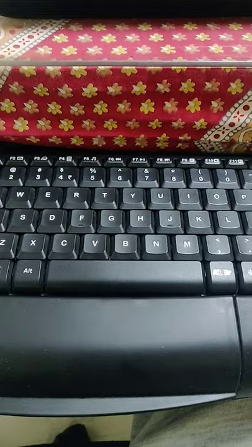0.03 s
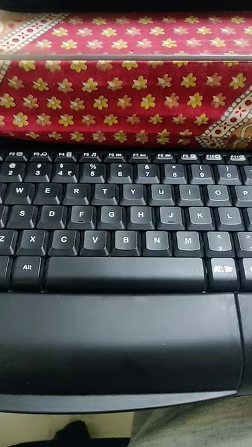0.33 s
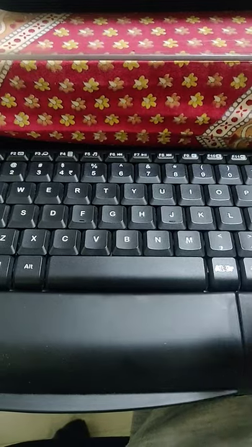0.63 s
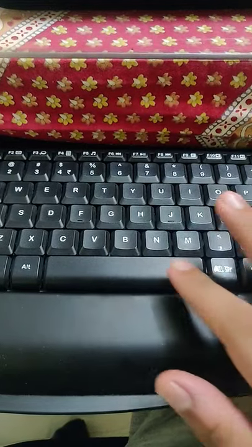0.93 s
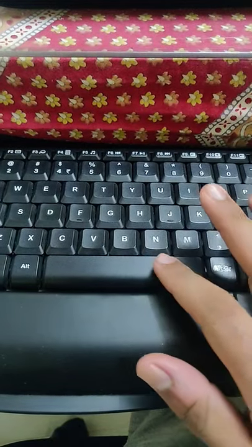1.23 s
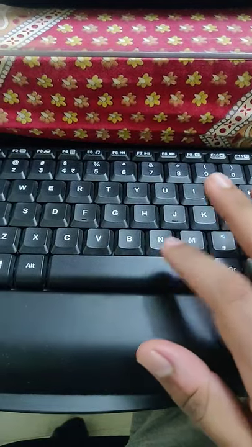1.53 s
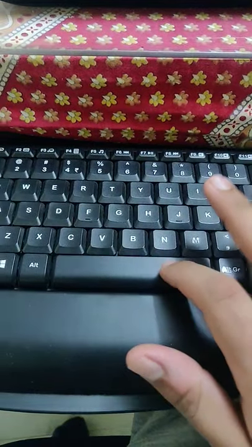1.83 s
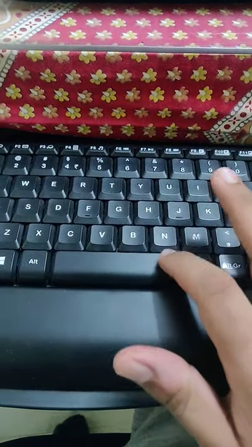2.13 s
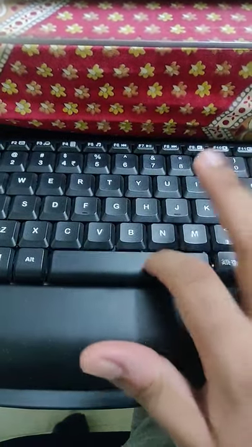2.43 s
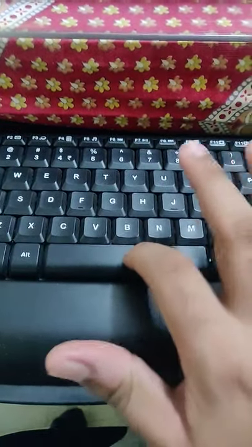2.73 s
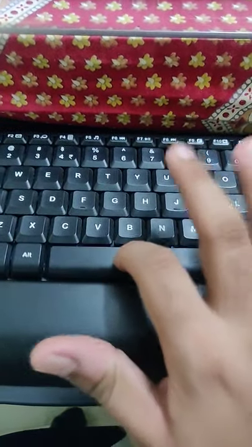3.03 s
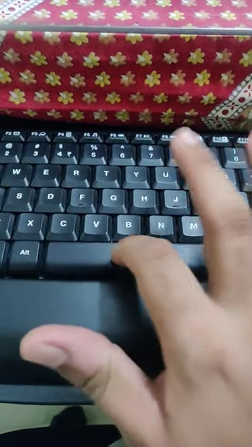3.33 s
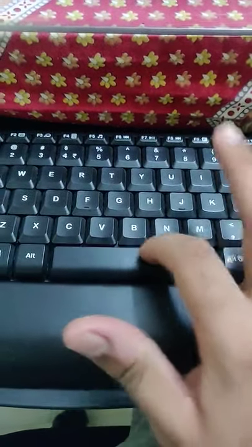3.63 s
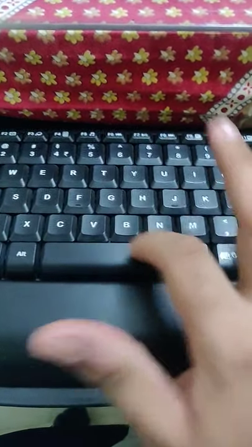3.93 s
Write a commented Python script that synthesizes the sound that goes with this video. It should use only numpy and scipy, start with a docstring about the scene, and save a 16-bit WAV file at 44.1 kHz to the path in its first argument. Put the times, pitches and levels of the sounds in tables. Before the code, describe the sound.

A finger taps a loose keyboard space bar, slowly at first, then in quick rattling clicks.

```python
"""A small quiet room: air noise, a low rumble and a wavering hum that soon recedes.
From 1.3 s a finger presses the space bar of a plastic keyboard a few times, close to the microphone.
Each contact is a short chatter of the loose bar and its wire, with a knock in the case.
From 2.6 s to the end the presses come in a rapid run: the rubber dome ticks, the bar rattles,
firm strokes thump the desk, the rumble is back up, and the room answers every stroke."""
import sys
import numpy as np
from scipy import signal
from scipy.fft import rfft, irfft
from scipy.io import wavfile
from scipy.ndimage import uniform_filter1d

SR = 44100
rng = np.random.default_rng(int(sys.argv[2]) if len(sys.argv) > 2 else 0)


def put_to_file(sound):
    """Save the sound as 16-bit audio at rate SR, in the file named by the first command-line argument."""
    columns = np.atleast_2d(sound).T  # one column per channel
    safe = np.clip(columns, -1, 1)
    whole_steps = np.round(safe * 32767)
    wavfile.write(sys.argv[1], SR, whole_steps.astype(np.int16))


N = 176400

# Bar contacts. Each row: peak time in seconds, relative snap level in dB, relative knock level in dB,
# treble lift in dB, nominal chatter length in seconds.
CONTACTS = [(1.2785, -34.5, -55.5, -0.5, 0.00249), (1.568, -60.5, -77, 3, 0.0059),
            (1.7834, -21, -31.5, 2.5, 0.00304), (1.856, -36, -37.5, -9, 0.0027),
            (1.8596, -27, -47, 5.5, 0.00434), (1.909, -28, -47, 4.5, 0.00108),
            (1.9441, -34, -38, 1, 0.0051), (1.949, -42.5, -46, 3, 0.0039),
            (2.099, -50.5, -48.5, -6, 0.00504), (2.2059, -31.5, -57, 2.5, 0.0036),
            (2.2503, -47, -46.5, -7, 0.0019), (2.288, -39, -39.5, 7, 0.00227),
            (2.3026, -42.5, -51, 6.5, 0.0026), (2.342, -57.5, -74, -2.5, 0.0051),
            (2.3899, -24.5, -32.5, 5.5, 0.00377), (2.4078, -27.5, -34.5, 0, 0.0029),
            (2.4153, -50.5, -34.5, 0, 0.006), (2.4661, -34.5, -40.5, -8, 0.0034),
            (2.5107, -42, -41, 1.5, 0.0044), (2.611, -37.5, -42.5, 4, 0.004),
            (2.623, -15.5, -26, 3, 0.00337), (2.6294, -22.5, -53, 5.5, 0.0048),
            (2.6729, -16, -29, 4, 0.00387), (2.678, -13, -25.5, 1.5, 0.00394), (2.689, -42, -26, 5, 0.0057),
            (2.746, -23, -32.5, 5.5, 0.0044), (2.7544, -29.5, -69, 1, 0.0067),
            (2.783, -36.5, -62.5, -1.5, 0.0064), (2.8371, -35.5, -65.5, -1, 0.0077),
            (2.8421, -44.5, -75.5, -6.5, 0.0038), (2.854, -32, -41, 4.5, 0.0072),
            (2.8931, -27.5, -33, 2, 0.00735), (2.9443, -23, -38, 5.5, 0.01123),
            (2.9632, -30, -43.5, 1.5, 0.0076), (3.0142, -34, -47, 5.5, 0.0044),
            (3.0236, -32, -39.5, 2.5, 0.0047), (3.083, -35, -42, 8, 0.0069),
            (3.0956, -31, -49.5, 2, 0.0083), (3.1053, -32, -39, 3.5, 0.0064),
            (3.115, -43.5, -30.5, -8, 0.0058), (3.1513, -27, -55.5, 1, 0.00405),
            (3.1627, -22.5, -36, 4.5, 0.00484), (3.1776, -28.5, -50.5, 2, 0.0035),
            (3.1904, -24, -40.5, 3, 0.00564), (3.1983, -31, -36, -9.5, 0.0028),
            (3.247, -28, -40.5, 0, 0.0057), (3.2539, -23.5, -40.5, 6, 0.00363),
            (3.2703, -28, -46.5, 4, 0.0085), (3.281, -30, -37.5, 5, 0.00464),
            (3.3281, -22.5, -28.5, 4, 0.006), (3.3373, -27, -51.5, 7.5, 0.0032),
            (3.3592, -19, -49.5, 5.5, 0.0047), (3.3641, -30, -29, 2.5, 0.0057),
            (3.4084, -30, -62, 7, 0.0055), (3.417, -32.5, -48, 9, 0.0029),
            (3.4352, -30.5, -43, -0.5, 0.0062), (3.4503, -32, -44.5, -3.5, 0.00505),
            (3.49, -32.5, -38.5, 9.5, 0.0114), (3.4959, -19.5, -33.5, 3, 0.00476),
            (3.509, -41.5, -45, -11, 0.0076), (3.529, -23.5, -32, 9, 0.00684),
            (3.5354, -24.5, -36, 4, 0.0051), (3.543, -34, -30, -2, 0.006), (3.5636, -34, -50, -10, 0.0057),
            (3.5874, -18.5, -26.5, -3, 0.0033), (3.5944, -24, -50, 9.5, 0.0067),
            (3.6199, -18.5, -34, 3, 0.00567), (3.6264, -24.5, -32.5, 3, 0.004),
            (3.631, -34, -38, -0.5, 0.007), (3.671, -15, -28, 5, 0.00322),
            (3.6783, -22.5, -45.5, 6.5, 0.00414), (3.7043, -24, -62.5, -3, 0.00276),
            (3.7106, -26, -35.5, 1.5, 0.00236), (3.719, -31.5, -34.5, 2.5, 0.0051),
            (3.7606, -15.5, -27, 4, 0.0039), (3.7685, -24.5, -59.5, 7, 0.00306),
            (3.7947, -21, -38.5, 5, 0.00366), (3.8052, -32.5, -32, 3, 0.0096),
            (3.81, -36.5, -33.5, -0.5, 0.0059), (3.8521, -21, -31.5, 4, 0.00533),
            (3.86, -26.5, -55, 2.5, 0.0061), (3.8798, -21, -29.5, 6, 0.00399),
            (3.8952, -31, -37.5, -4.5, 0.00234), (3.902, -48.5, -30.5, -4, 0.0067),
            (3.941, -38, -45.5, -13.5, 0.0033), (3.9742, -30.5, -34, -11, 0.0042),
            (3.978, -34.5, -39, 6, 0.0045)]
# Snap spectrum at each microphone, and knock spectrum. Each row: frequency in Hz, gain in dB.
SNAP_LEFT_DB = [(300, -25), (1500, -37), (2300, -12.5), (3700, -15.5), (4800, -1.5), (5800, 1.5),
                (6600, -3.5), (7500, -12.5), (9200, -38.5), (10600, -40.5), (13000, -39.5), (15500, -33)]
SNAP_RIGHT_DB = [(300, -25), (1500, -20), (2600, -15), (4000, -13.5), (6500, -13), (7500, -22.5),
                 (8500, -10.5), (9400, -17.5), (10600, -40), (13000, -29), (15500, -28.5)]
KNOCK_COLOUR_DB = [(100, -15.5), (280, 0), (430, -10.5), (750, -1), (950, -1.5), (1150, 6), (1550, 0.5),
                   (2100, -5.5), (3200, -7), (5000, -33), (12000, -60)]
# Case and desk resonances. Each row: frequency in Hz, relative level in dB, T60 in seconds.
CASE_MODES = [(593.6, -11.5, 0.043), (794.7, -5.5, 0.0535), (927, -15.5, 0.035), (1108.3, -2, 0.0351),
              (1178.2, -1.5, 0.0717), (1386, -3, 0.028), (1451, -2.5, 0.031), (1707, -4.5, 0.0199),
              (2001, -6.5, 0.0161)]
DESK_MODES = [(64.54, -9, 0.184), (116.1, -2.5, 0.1113), (164.3, -3.5, 0.248), (233.5, -1, 0.1322),
              (307.9, -8, 0.0644), (397.8, -9.5, 0.095)]
# Strokes that shake the desk. Each row: start in seconds, relative level in dB, pitch in Hz.
DESK_THUMPS = [(1.785, -45, 156.4), (1.8, -44, 171), (1.945, -41.5, 150.1), (2.274, -44, 178.8),
               (2.314, -44, 171.8), (2.408, -38, 237.8), (2.621, -40, 168.4), (2.679, -25.5, 129),
               (2.745, -63, 168), (2.889, -54.5, 101), (3.027, -36.5, 170.6), (3.106, -30, 151.9),
               (3.166, -38.5, 163.6), (3.194, -46, 170), (3.28, -38, 147.5), (3.337, -39, 168.4),
               (3.372, -32.5, 163.9), (3.436, -38.5, 167.5), (3.493, -35, 177), (3.543, -30, 165.2),
               (3.584, -53, 169), (3.608, -40.5, 103), (3.65, -38.5, 170), (3.68, -39.5, 229.4),
               (3.714, -65, 102), (3.763, -43.5, 234.3), (3.8, -36.5, 106.7), (3.827, -38, 161),
               (3.865, -40, 159.3), (3.894, -32.5, 229), (3.974, -37.5, 175.3)]
# Dome ticks. Each row: peak time in seconds, relative level in dB.
DOME_TICKS = [(1.8443, -43), (2.2803, -34.5), (2.6159, -31), (2.737, -35.5), (2.8824, -30), (3.0701, -32.5),
              (3.3199, -34), (3.575, -35), (3.6628, -29.5), (3.7524, -31.5), (3.8426, -30.5), (3.869, -33)]
# Dome tick spectrum. Each row: frequency in Hz, gain in dB.
TICK_COLOUR_DB = [(300, -27.5), (2000, -23.5), (3200, -6), (3900, -18), (5100, -2.5), (6000, -7.5),
                  (7500, -32.5), (10500, -43.5), (15000, -46.5)]
# Room decay. Each row: frequency in Hz, T60 in seconds.
ROOM_T60_S = [(150, 1), (500, 0.08), (1200, .5), (3000, 0.5258), (6000, 0.3378), (9000, 0.4463),
              (15000, 0.03)]
# Spectra of the reflections, air noise and rumble. Each row: frequency in Hz, gain in dB.
ROOM_COLOUR_DB = [(100, -9.5), (250, 0.5), (600, -2), (1200, -8.5), (2000, -8.5), (2700, -7), (3800, -4),
                  (5300, -14), (6300, -4.5), (8500, -7), (10500, -16.5), (15000, -8.5)]
AIR_COLOUR_DB = [(20, 1), (50, 0.5), (90, -1.5), (130, -16.5), (200, -14), (300, -14.5), (450, -18.5),
                 (700, -22.5), (1500, -26), (3000, -27.5), (6000, -28), (8000, -33.5), (10500, -36.5),
                 (15500, -34)]
RUMBLE_COLOUR_DB = [(3, -11.5), (12, 5.5), (25, -2.5), (50, -5.5), (100, -8), (200, -14.5), (400, -24.5),
                    (2000, -50)]
# Left-right likeness of air noise and reflections. Each row: frequency in Hz, correlation from 0 to 1.
ROOM_CORR = [(50, 0.862), (300, 0.674), (1000, 0.167), (4000, 0.118), (15000, 0.043)]
# Air noise balance. Each row: frequency in Hz, left over right in dB.
AIR_BALANCE_DB = [(50, 4), (400, 2.15), (1500, 2.2), (10000, 0.71)]
# Envelopes of the rattle, hum and rumble. Each row: time in seconds, level in dB.
RATTLE_LEVEL_DB = [(0, -108), (1.75, -86.5), (2.2, -62), (2.45, -59), (2.58, -65), (2.7, -53),
                   (2.82, -51.5), (3.0, -42), (3.3, -48.5), (3.6, -47.5), (3.88, -60.5), (4, -66.5)]
HUM_LEVEL_DB = [(0, -60.5), (.4, -58), (.5, -67), (1.2, -68), (1.6, -74.5), (4, -72.5)]
RUMBLE_LEVEL_DB = [(0, -54), (1.7, -75), (2.3, -50), (2.6, -46.5), (2.75, -44.5), (2.95, -43.5),
                   (3.3, -44.5), (4, -43)]

SNAP_DB, KNOCK_DB, THUMP_DB, TICK_DB, AIR_DB = -2, -1, -2.5, -1, -56
KNOCK_RIGHT_DB, DESK_RIGHT_DB, TICK_RIGHT_DB = -9.5, -6.5, -11.5
SNAP_CORR, KNOCK_CORR = 0.271, 0.939
BURST_SAMPLES, PEAK_SAMPLE = 4096, 512
KNOCK_LEAD_S, BACKGROUND_START_S, CUTOFF_HZ = 0.0011638, 0.07805, 15900
BURST_HZ, SCENE_HZ = np.fft.rfftfreq(BURST_SAMPLES, 1 / SR), np.fft.rfftfreq(N, 1 / SR)


def bar_snap(treble_db, length_s, impacts_per_s=12000, ring_db=-17, ring_s=0.009):
    """Bar and wire chatter: tiny impacts start abruptly, hold and die, leaving a short ring."""
    t = (np.arange(BURST_SAMPLES) - PEAK_SAMPLE) / SR
    u = t / (length_s * np.where(t < 0, 0.644, 0.676))  # rise, fall
    swell = np.where(t < 0, np.exp(-u ** 4), 1 / (1 + u ** 4))
    tail = amp(ring_db) * (t > 0) * np.exp(-abs(t) / ring_s)
    impacts = correlate(noise(BURST_SAMPLES), SNAP_CORR)
    impacts *= rng.random(BURST_SAMPLES) < impacts_per_s / SR
    ripple_db = 3 * wander(len(BURST_HZ), 50)
    shelf_db = treble_db * np.clip((BURST_HZ - 6000) / 2000, 0, 1)
    snap = colour(impacts * (swell + tail), snap_colour_db(BURST_HZ) + ripple_db + shelf_db)
    return unit_loudest(snap, 110)


def snap_colour_db(hz):
    """Snap spectrum, left and right."""
    return np.array([at_hz(SNAP_LEFT_DB, hz), at_hz(SNAP_RIGHT_DB, hz)])


def case_knock(rise_s=0.000713, fall_s=0.004075, modes_db=-3.5):
    """The bar lands on the hollow case, which rings; the colour varies with the spot struck."""
    t = np.arange(BURST_SAMPLES) / SR
    blow = correlate(noise(BURST_SAMPLES), KNOCK_CORR) * np.exp(-t / fall_s) * (1 - np.exp(-t / rise_s))
    ripple_db = 5 * wander(len(BURST_HZ), 40)
    blow = unit_loudest(colour(blow, at_hz(KNOCK_COLOUR_DB, BURST_HZ) + ripple_db), 120)
    modes = unit_loudest(ring(CASE_MODES, t, detune=0.02396)[None], 120)
    return unit_loudest((blow + amp(modes_db) * modes) * pan(KNOCK_RIGHT_DB), 120)


def desk_thump(hz, t60_s=0.1406, modes_db=-4, push_s=0.0022):
    """The finger's push sets the desk ringing low, most strongly at one pitch."""
    t = np.arange(SR // 4) / SR
    body = ring([(hz, 0, t60_s)], t, detune=0.0063) + amp(modes_db) * ring(DESK_MODES, t, detune=0.03015)
    return unit_loudest(body * (1 - np.exp(-t / push_s)) * pan(DESK_RIGHT_DB), 260)


def dome_tick(half_width_s=0.001645):
    """A light, short tick of the key's rubber dome, often just before a louder clack."""
    t = (np.arange(BURST_SAMPLES) - PEAK_SAMPLE) / SR
    burst = correlate(noise(BURST_SAMPLES), SNAP_CORR) * np.exp(-(t / half_width_s) ** 2)
    return unit_loudest(colour(burst, at_hz(TICK_COLOUR_DB, BURST_HZ)) * pan(TICK_RIGHT_DB), 80)


def bar_rattle(ticks_per_s=260, spread_db=3.5, fall_s=0.00068, case_db=-9):
    """Faint random ticks of the loose bar under the moving finger."""
    sizes = amp(spread_db * np.minimum(rng.exponential(1, N), 3))
    sizes *= rng.random(N) < ticks_per_s / SR
    ticks = signal.lfilter([1], [1, -np.exp(-1 / (fall_s * SR))], sizes) * noise(N)
    bar = colour(ticks, snap_colour_db(SCENE_HZ))
    case = colour(correlate(ticks, KNOCK_CORR), at_hz(KNOCK_COLOUR_DB, SCENE_HZ)) * pan(KNOCK_RIGHT_DB)
    return envelope(RATTLE_LEVEL_DB) * (unit_rms(bar) + amp(case_db) * unit_rms(case))


def room_reflections(x, taps_per_s=5000, delay_s=0.003, rise_s=0.0023):
    """Dense reflections, each band dying at its own rate."""
    t = np.arange(SR * 3 // 4) / SR
    taps = noise(len(t)) * (rng.random(len(t)) < taps_per_s / SR) / np.sqrt(taps_per_s / SR)
    taps *= np.clip((t - delay_s) / rise_s, 0, 1)
    hz, age_s, bands = signal.stft(taps, SR, nperseg=256)
    hz = hz[:, None]
    t60_s = at_hz(ROOM_T60_S, hz)
    decay = amp(-60 * age_s / t60_s) * np.sqrt(2 * np.log(1000) / (t60_s * SR))  # unit energy
    bands = correlate(bands, at_hz(ROOM_CORR, hz)) * amp(at_hz(ROOM_COLOUR_DB, hz)) * decay
    response = signal.istft(bands, SR, nperseg=256)[1]
    return signal.fftconvolve(x, response, axes=1)[:, :N]


def rumble():
    """Low noise that sinks away, then swells while the hand works."""
    spectrum = correlate(rfft(noise(N)), 0.856) * amp(at_hz(RUMBLE_COLOUR_DB, SCENE_HZ))
    return envelope(RUMBLE_LEVEL_DB) * unit_rms(irfft(spectrum))


def hum(hz=170.35):
    """One low tone, wavering in pitch and level."""
    pitch_hz = hz * (1 + 0.0121 * wander(N, 4000))
    tone = np.sqrt(2) * np.sin(2 * np.pi * np.cumsum(pitch_hz) / SR)
    return envelope(HUM_LEVEL_DB) * tone * (1 + 0.25 * wander(N, 3000))


def air_noise():
    """Steady room noise, a little stronger on the left."""
    spectrum = correlate(rfft(noise(N)), at_hz(ROOM_CORR, SCENE_HZ))
    balance_db = np.array([[.5], [-.5]]) * at_hz(AIR_BALANCE_DB, SCENE_HZ)
    return amp(AIR_DB) * unit_rms(irfft(spectrum * amp(at_hz(AIR_COLOUR_DB, SCENE_HZ) + balance_db)))


def background(fade_s=0.0059):
    """Air noise, rumble and hum, faded in together."""
    fade = np.clip((np.arange(N) / SR - BACKGROUND_START_S) / fade_s, 0, 1)
    return fade * (air_noise() + unit_rms(pan(DESK_RIGHT_DB)) * (rumble() + hum()))


def amp(db):
    return 10 ** (np.asarray(db) / 20)


def pan(right_db):
    return amp([[0], [right_db]])


def noise(samples):
    return rng.standard_normal((2, samples))


def unit_rms(x):
    return x / np.sqrt(np.mean(x ** 2) + 1e-20)


def unit_loudest(x, samples):
    """Unit rms in the loudest window."""
    return x / np.sqrt(uniform_filter1d((x ** 2).mean(0), samples).max() + 1e-20)


def wander(points, window):
    """Smoothed noise, unit rms."""
    return unit_rms(uniform_filter1d(rng.standard_normal(points), window))


def at_hz(table, hz):
    """Table lookup on a log-frequency axis."""
    table_hz, values = np.transpose(table)
    return np.interp(np.log(hz + 1), np.log(table_hz + 1), values)


def envelope(table):
    """Gain per sample from rows of seconds and dB."""
    return amp(np.interp(np.arange(N) / SR, *np.transpose(table)))


def colour(x, gain_db):
    """Minimum-phase filter, one gain per bin."""
    cepstrum = irfft(gain_db * np.log(10) / 20)
    n = cepstrum.shape[-1]
    causal_fold = (1 + np.sign(n / 2 - np.arange(n))) * np.where(np.arange(n), 1, .5)
    return irfft(rfft(x) * np.exp(rfft(cepstrum * causal_fold)))


def correlate(x, corr):
    """Makes two independent channels partly alike."""
    return np.array([x[0], corr * x[0] + np.sqrt(1 - corr ** 2) * x[1]])


def ring(modes, t, detune):
    """Decaying modes, random in sign and slightly detuned per blow."""
    total = 0
    for hz, db, t60_s in modes:
        decay = rng.choice([-1, 1]) * amp(db - 60 * t / t60_s)
        total += decay * np.sin(2 * np.pi * hz * (1 + detune * rng.standard_normal()) * t)
    return total


def add(mix, start_s, sound):
    part = mix[:, max(round(start_s * SR), 0):][:, :sound.shape[1]]
    part += sound[:, :part.shape[1]]


def scene():
    """The keyboard on its desk, in the room."""
    keys = bar_rattle()
    for peak_s, snap_db, knock_db, treble_db, length_s in CONTACTS:
        add(keys, peak_s - PEAK_SAMPLE / SR, amp(SNAP_DB + snap_db) * bar_snap(treble_db, length_s))
        add(keys, peak_s - KNOCK_LEAD_S, amp(KNOCK_DB + knock_db) * case_knock())
    for peak_s, db in DOME_TICKS:
        add(keys, peak_s - PEAK_SAMPLE / SR, amp(TICK_DB + db) * dome_tick())
    for start_s, db, hz in DESK_THUMPS:
        add(keys, start_s, amp(THUMP_DB + db) * desk_thump(hz))
    return keys + room_reflections(keys) + background()


def record(dry):
    """Sound reaches the right microphone two samples late; the recorder limits the band."""
    right = np.concatenate([np.zeros(2), dry[1, :-2]])
    lowpass = signal.firwin(401, CUTOFF_HZ, window=("kaiser", 9), fs=SR)
    return signal.oaconvolve(np.array([dry[0], right]), lowpass[None], "same")


dry = scene()
out = record(dry)
put_to_file(out)
```